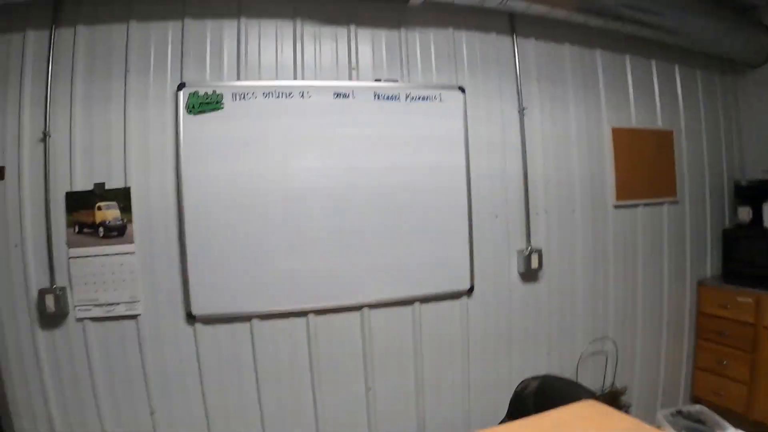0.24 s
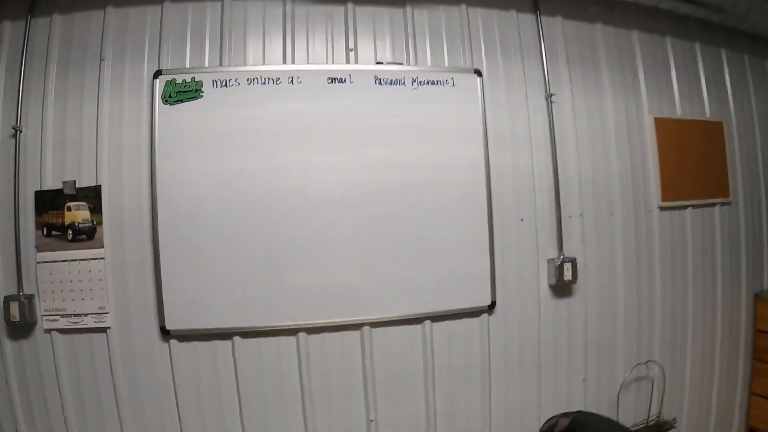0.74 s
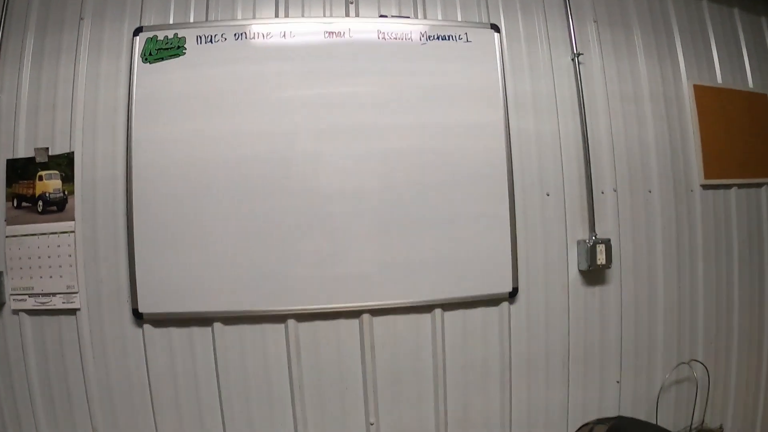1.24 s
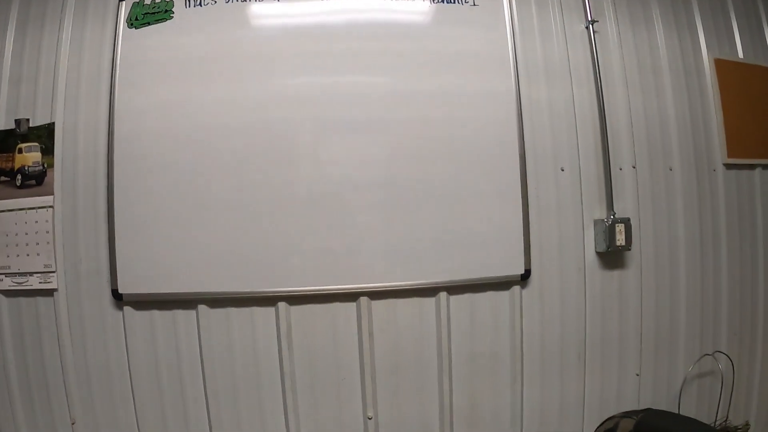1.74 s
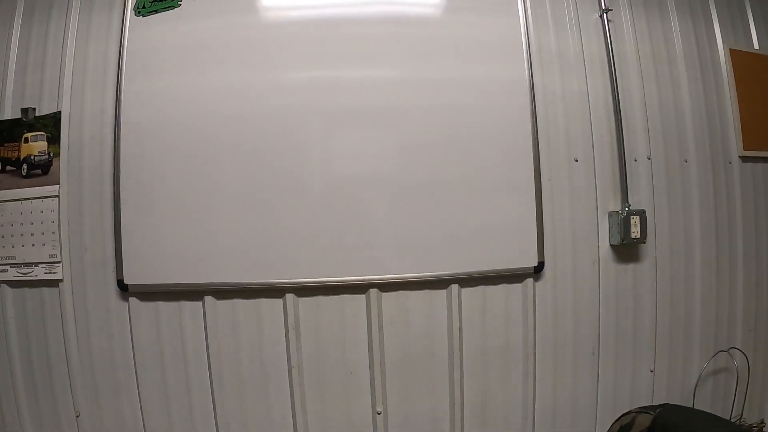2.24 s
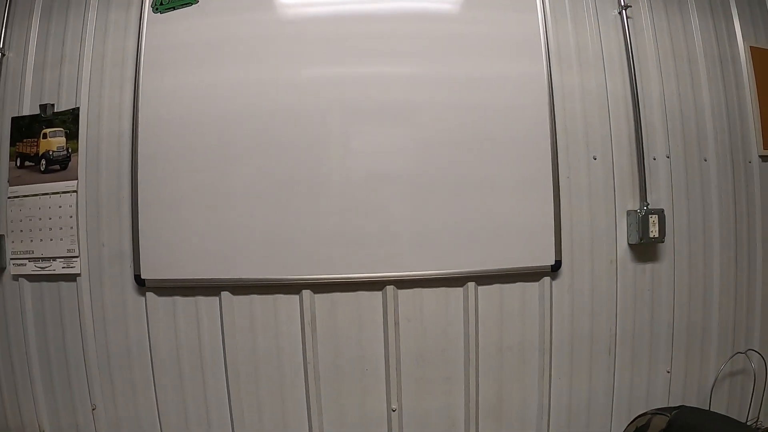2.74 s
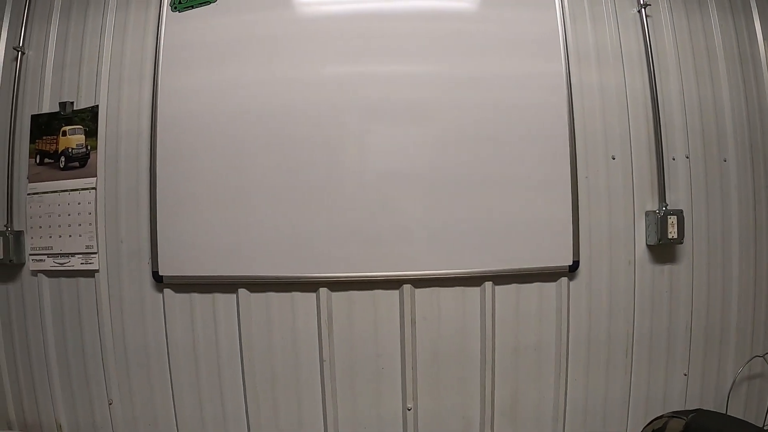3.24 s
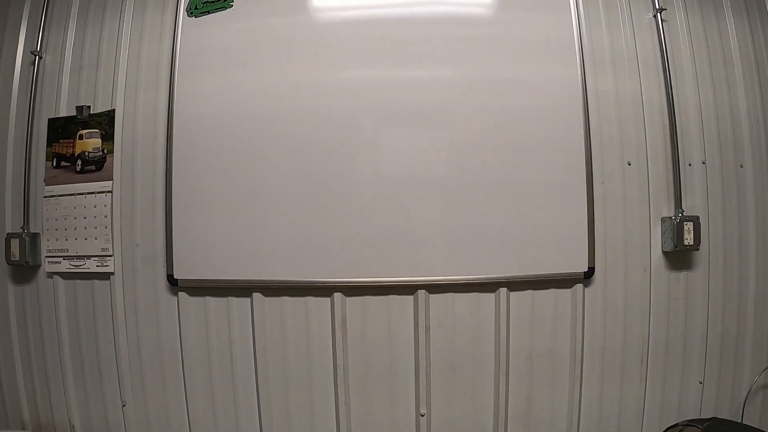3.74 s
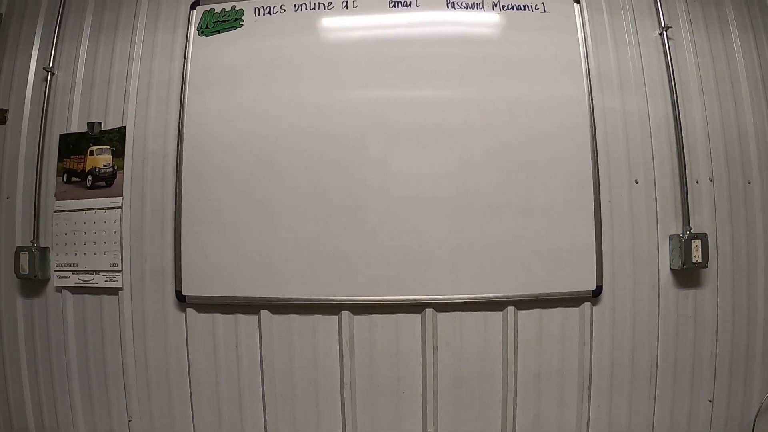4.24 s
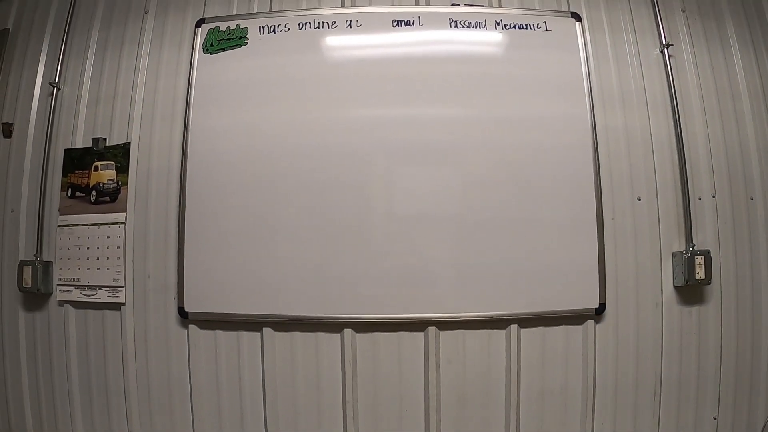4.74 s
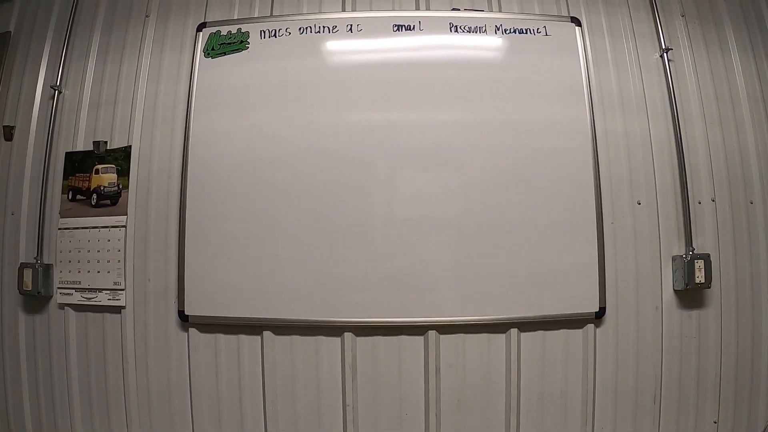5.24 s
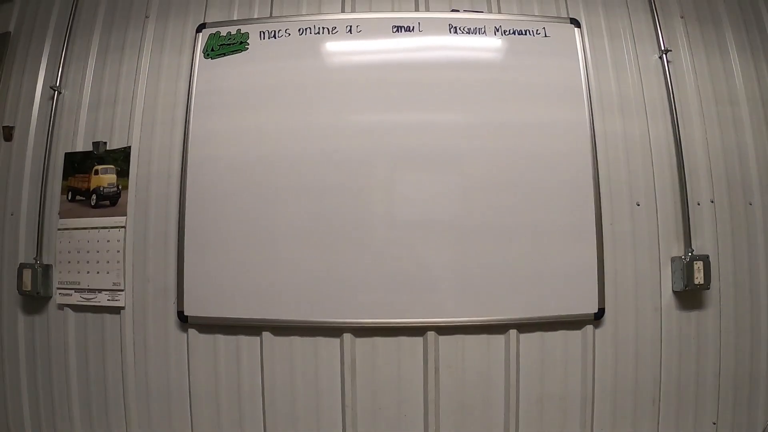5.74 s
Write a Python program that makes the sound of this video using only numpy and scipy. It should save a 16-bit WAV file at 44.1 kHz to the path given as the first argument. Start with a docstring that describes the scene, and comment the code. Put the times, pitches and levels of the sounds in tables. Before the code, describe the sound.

Close stereo handling noise of a small plastic camera, slightly stronger on the right, in a metal-walled workshop with faint steady air. At the start a low rumble from a bang is already dying away, gone within about a second or two. Hollow clacks and clicks fall at 0.2, 0.5 and 1.1 s, while a palm slides over the case in soft broadband swishes from 0.5 to 2.7 s, with thin, fluttering skin squeaks. A heavy double knock lands at 2.1 s; smaller taps follow, and a thunk near 2.5 s leaves a brief low hum, stopped at 2.7 s. Almost silence follows, with one very faint tap at 3.2 s. From 3.7 s fingers grip again: juddering, gritty rubs, dull thuds at 4.1 and 4.3 s, then increasingly crowded knocks and crisp plastic clicks. Low air bumps hit the microphones after 5.2 s. The heaviest knock and snap come at 5.7 s, another thump just before 6 s.

```python
"""Fingers handle a small camera, close on two microphone ports: knocks and juddering rubs ring its body,
clicks and clacks ring its shell and support, and moving air is pressed into the ports.
Earlier a palm slides over the case in swishes of noise, skin squeaks, and the support hums after a thunk.
Then the handling pauses almost to silence before the fingers grip again, harder and busier.
Behind lies a workshop: faint air noise, the fading rumble of a bang, short reflections of the blows."""
import sys
import numpy as np
from scipy import signal
from scipy.fft import rfft, irfft
from scipy.io import wavfile

SR = 44100
rng = np.random.default_rng(int(sys.argv[2]) if len(sys.argv) > 2 else 0)


def waveform_to_disk(signal):
    """Save audio, clipped to [-1, 1], as 16-bit WAV at the path in sys.argv[1]."""
    frames = np.transpose(np.atleast_2d(signal))
    scaled = np.clip(frames, -1, 1) * 32767
    samples = np.round(scaled).astype(np.int16)
    wavfile.write(sys.argv[1], SR, samples)


N = 263718

# Steady air of the place, spectrum: f/Hz, relative level/dB
AIR_SPECTRUM = [(25, -20), (104, -13), (160, 3), (250, 0), (330, -14), (800, -23), (6000, -22.5),
                (9500, -31), (16000, -66)]
# Rumble after the bang, spectrum: f/Hz, relative level/dB
RUMBLE_SPECTRUM = [(25, -10), (54, -4.5), (120, -5.5), (240, -4.5), (450, -15), (870, -12.5), (1300, -18),
                   (3100, -25), (7000, -42.5), (16000, -65.5)]
# Its decay by register: f/Hz, time to fall 60 dB/s
RUMBLE_DECAY = [(60, 2.2), (200, 1.25), (800, 0.93), (4000, 0.77), (10000, 0.7)]
# Skin brushing the case, broad part, spectrum: f/Hz, relative level/dB
SWISH_SPECTRUM = [(300, -6.5), (1800, -1), (3400, -9.5), (4800, -6), (6200, -29.5), (16000, -49)]
# Fine hiss of skin, spectrum: f/Hz, relative level/dB
HISS_SPECTRUM = [(2000, -5), (6400, -8), (10000, -19.5), (13000, -29.5), (16000, -64)]
# Dry scuff of a dragged finger, spectrum: f/Hz, relative level/dB
SCUFF_SPECTRUM = [(1500, -2), (3600, -5), (6500, -9.5), (9000, -17), (13000, -28), (16000, -50)]
# Air pressed into the ports, spectrum: f/Hz, relative level/dB
PRESSURE_SPECTRUM = [(10, 8.5), (25, -4), (45, -12.5), (70, -2), (100, -11.5), (160, -28), (400, -104)]
# Camera body ringing in the hand: f/Hz, width/Hz, level/dB
BODY_MODES = [(63.3, 7.1, -8.5), (156.2, 55.6, 3.5), (241.3, 72.2, 5), (322, 57.7, 2.5), (398.3, 110, -5.5)]
# Plastic shell: f/Hz, width/Hz, level/dB
SHELL_MODES = [(690, 535, 3), (955, 248, 4.5), (1026, 74, 6.5), (1340, 577, -4), (1790, 405, -4.5),
               (2853, 230, -8.5), (2920, 1100, -13)]
# Rasp of skin on the shell: f/Hz, width/Hz, level/dB
RASP_MODES = [(3360, 600, -15.5)]
# Hollow ring of the case on its support: f/Hz, width/Hz, level/dB
HOLLOW_MODES = [(850, 62, 20.5), (980, 83, -14.5)]
# Palm speed in three slides, each as swish level before its gain: t/s, level/dB
PALM_SLIDES = [
    [(0.52, -67.5), (0.712, -59.5), (0.92, -67), (0.972, -62.5), (1.09, -60)],
    [(1.14, -96), (1.198, -61), (1.548, -56), (1.79, -58.5), (1.946, -65.5), (2.05, -61)],
    [(2.17, -85.5), (2.234, -60.5), (2.3, -63.5), (2.446, -73.5), (2.464, -68), (2.65, -67.5)],
]
# Band that stands out of the slides: t/s, level/dB
SLIDE_BAND = [(1.17, -62), (1.205, -51.5), (1.31, -69), (1.64, -48.5), (1.79, -48), (1.91, -63)]
# Skin squeaking on plastic: start t/s, end t/s, f/Hz, level/dB
SKIN_SQUEAKS = [(0.64, 0.83, 4370, -49), (0.3, 1.6, 1850, -60), (0.39, 0.45, 1900, -50),
                (0.69, 0.81, 900, -49), (0.92, 1.14, 4450, -55), (1.43, 1.64, 4330, -49),
                (1.84, 1.9, 900, -51), (4.02, 4.19, 4120, -53.5)]
# Hand pressure, as level of air at the ports before its gain: t/s, level/dB
HAND_PRESSURE = [(0.3, -65), (0.6, -48), (1.05, -55.5), (1.75, -67), (2.15, -35), (2.6, -94), (3.64, -72),
                 (3.82, -39.5), (4.35, -41), (5.2, -37.5), (5.98, -36)]
# Gusts into the ports as the grip shifts: t/s, peak level/dB, f/Hz
GRIP_GUSTS = [(5.169,-28,69), (5.44,-27.5,55), (5.498,-26,33.4), (5.733,-22.5,85), (5.963,-13,67)]
# Fingers catching at a steady rate: start t/s, end t/s, f/Hz, level/dB
STICK_SLIP_GROANS = [(4.203,4.253,277.2,-37.5), (5.619,5.678,278,-38)]
# Finger strokes: start t/s, end t/s, force level/dB, dry friction level/dB before its gains
FINGER_RUBS = [(0.304,0.508,-59,-63), (0.722,0.753,-44.5,-49), (1.467,1.526,-47.5,-61),
               (1.893,1.941,-42.5,-82), (1.981,2.116,-40.5,-66.5), (2.077,2.162,-32,-66.5),
               (2.198,2.306,-43,-80), (2.313,2.369,-56,-60.5), (2.462,2.646,-49.5,-80),
               (3.704,3.856,-45.5,-68.5), (3.818,3.871,-31.5,-68.5), (3.889,4.006,-31,-72),
               (4.055,4.075,-63,-52.5), (4.148,4.193,-35.5,-65.5), (4.183,4.252,-26.5,-65.5),
               (4.459,4.496,-33.5,-67), (4.547,4.614,-36.5,-74), (4.654,4.693,-36.5,-70.5),
               (4.749,4.79,-26.5,-61), (4.793,4.906,-32,-72), (4.895,4.972,-37,-57), (4.97,4.998,-32,-65.5),
               (5.011,5.084,-35,-64), (5.085,5.149,-32.5,-62.5), (5.194,5.235,-32,-60.5),
               (5.235,5.303,-52,-61), (5.331,5.405,-40.5,-68), (5.399,5.483,-46,-56.5),
               (5.437,5.474,-32,-73), (5.503,5.621,-36.5,-71.5), (5.632,5.664,-32.5,-72),
               (5.762,5.86,-35.5,-78), (5.855,5.872,-31,-87), (5.926,5.98,-37,-79)]
# Case against its support: t/s, peak level/dB, f/Hz
SUPPORT_CLACKS = [(0.218,-34,820), (0.495,-29,878), (0.558,-38,990), (0.638,-45,970), (1.105,-30.5,850),
                  (2.125,-34.5,960), (2.232,-36.5,1870), (2.463,-43,600), (4.099,-32,994), (5.735,-28,690)]
# Plastic clicks: t/s, crack level/dB, shell ring level/dB, both before their gains
PLASTIC_CLICKS = [(0.2202,-37.5,-30), (0.4944,-41,-34.5), (1.1048,-28.5,-46.5), (2.0742,-44,-23),
                  (2.0825,-52,-26.5), (2.6621,-40.5,-47), (3.8025,-31,-75), (3.8439,-35,-72),
                  (4.3038,-41,-44), (4.459,-47,-62), (4.51,-44.5,-54), (4.549,-50,-48), (4.616,-46.5,-52),
                  (4.6495,-39.5,-59), (4.9279,-25.5,-30), (5.004,-40.5,-71), (5.1301,-32.5,-42),
                  (5.173,-43,-51), (5.203,-42,-37.5), (5.233,-39,-50), (5.4052,-25.5,-21.5),
                  (5.438,-37.5,-31.5), (5.497,-35.5,-34.5), (5.7335,-25.5,-17.5), (5.969,-38.5,-28.5)]
# Dull knocks on the body: t/s, level/dB before the gain of each part, f/Hz
BODY_KNOCKS = [(0.471,-28.5,90.4), (1.105,-36,194), (2.074,-18.5,269), (2.0825,-17.5,276),
               (2.329,-36.5,180), (2.383,-34,194), (2.466,-32.5,224), (2.668,-44,230), (3.166,-49,178),
               (4.098,-24.5,230), (4.12,-26,230), (4.299,-18.5,227), (4.393,-24,200), (4.672,-24.5,208),
               (4.885,-25,236), (5.12,-28.5,130.6), (5.173,-27.5,141), (5.216,-29,227), (5.37,-25,163),
               (5.716,-21,148), (5.734,-17,335), (5.737,-9,253), (5.964,-13.5,199)]

BODY_HZ = 230   # knock pitch at which the body modes are unshifted
PORT_BALANCE_DB = -8.5   # left minus right: the right port lies nearer the hand
MEAN_FORCE_DB, MEAN_FORCE_HZ, FORCE_DB_PER_OCTAVE = -30, 197.4, 31   # a firmer finger stiffens the body


def from_db(db):
    """Decibels to gain."""
    return 10 ** (np.asarray(db) / 20)


def rms_one(x):
    """Scale to unit power."""
    return x / np.sqrt(np.mean(x ** 2) + 1e-20)


def level_curve(rows):
    """Times and levels as a gain curve, silent outside its span."""
    s, db = np.transpose(rows)
    return from_db(np.interp(np.arange(N) / SR, s, db, left=-200, right=-200))


def at_hz(points, hz):
    """Read a table on a log-frequency axis."""
    f, value = np.transpose(points)
    return np.interp(np.log(hz + 1e-9), np.log(f), value)


def cut(x, hz, kind, order=2):
    """Causal Butterworth filter."""
    edge = np.clip(hz, 10, .45 * SR)
    return signal.sosfilt(signal.butter(order, edge, kind, fs=SR, output="sos"), x)


def resonate(x, modes, stretch=1):
    """Parallel resonances with alternating signs; stretch scales both pitch and width."""
    out = 0
    for k, (hz, width, db) in enumerate(modes):
        radius = np.exp(-np.pi * width * stretch / SR)
        angle = 2 * np.pi * hz * stretch / SR
        feed = np.array([1, 0, -1]) * (1 - radius ** 2) / 2
        feedback = [1, -2 * radius * np.cos(angle), radius ** 2]
        out = out + (-1) ** k * from_db(db) * signal.lfilter(feed, feedback, x + 1e-18)
    return out


def panned(db):
    """Left and right gains for a level difference, left minus right."""
    return from_db(np.array([[db], [-db]]) / 2)


def pair(mid, side, side_db):
    """Two microphones hear a common part and a part of opposite sign."""
    return mid + from_db(side_db) * side * np.array([[1], [-1]])


def noise(spectrum, side_db):
    """Stereo noise of a given colour."""
    colour = from_db(at_hz(spectrum, np.fft.rfftfreq(N, 1 / SR)))
    coloured = irfft(rfft(rng.standard_normal((2, N))) * colour, N)
    return pair(*rms_one(coloured), side_db)


def slips(per_s, spread_db):
    """Random tiny slips of uneven size and either sign."""
    happens = rng.random(N) < per_s / SR
    size = from_db(spread_db * np.clip(rng.standard_normal(N), -2, 2))
    return happens * size * rng.choice([-1, 1], N)


def flutter(hz, depth_db):
    """Uneven contact pressure as a slowly random gain of unit power."""
    wander = rms_one(cut(rng.standard_normal(N), hz, "low"))
    return rms_one(from_db(depth_db * wander))


def contact(t60, grit):
    """One impact followed by a brief crunch of the touching surfaces."""
    t = np.arange(SR // 6) / SR
    return (t == 0) + grit * rng.standard_normal(len(t)) * from_db(-60 * t / t60)


def add(out, s, sound, db, pan_db=0):
    """Place a sound at a time, with a peak level before panning."""
    at = int(s * SR)
    placed = from_db(db) * panned(pan_db) * sound / np.abs(sound).max()
    out[:, at:at + sound.shape[-1]] += placed[:, :N - at]


def stroke(start, end, rise, fall):
    """A gesture's envelope: it sets in, holds and lets go."""
    t = np.arange(N) / SR
    return np.clip(np.minimum((t - start) / rise, (end - t) / fall) + .5, 0, 1)


def swell(start, end):
    """A gesture's envelope: it grows to the middle and fades."""
    t = np.arange(N) / SR
    return np.sin(np.pi * np.clip((t - start) / (end - start), 0, 1))


def workshop_air(db=-67):
    """Steady coloured noise stands for the air of the place."""
    return from_db(db) * noise(AIR_SPECTRUM, side_db=1.0)


def rumble(db=-24):
    """The room rings out after a bang; the higher the register, the sooner it dies."""
    t = np.arange(N) / SR
    start = rfft(noise(RUMBLE_SPECTRUM, side_db=-15.5))
    f = np.fft.rfftfreq(N, 1 / SR)
    out = 0
    for hz, t60 in RUMBLE_DECAY:
        # overlapping registers that sum to the whole spectrum
        share = at_hz([(centre, centre == hz) for centre, _ in RUMBLE_DECAY], f)
        out = out + irfft(start * share, N) * from_db(-60 * t / t60)
    return from_db(db) * out


def workshop(x, t60=0.14, wall_hz=5500):
    """Diffuse reflections from the metal walls: decaying noise that begins 6 ms after the sound."""
    t = np.arange(SR // 2) / SR
    tail = rng.standard_normal((2, len(t))) * from_db(-60 * t / t60) * (t > .006)
    tail = cut(tail / np.sqrt(np.sum(tail[0] ** 2)), wall_hz, "low")
    return signal.fftconvolve(x.mean(axis=0)[None], tail, axes=1)[:, :N]


def support(s=2.465, held_s=2.68, hz=107, t60=0.74, db=-35):
    """Let go, the support swings on in one low, decaying note until a finger stills it."""
    t = np.maximum(np.arange(N) / SR - s, 0)
    swing = from_db(db - 60 * t / t60) * np.sin(2 * np.pi * hz * t)
    return swing * stroke(s, held_s, rise=0.0048, fall=0.054)


def slide(swish_db=3.5, drag_db=-4.5, band_hz=2800, band_width_hz=1500, fade_s=0.15, release_s=0.21):
    """Skin brushes the case: a swish, a band that stands out, a fine hiss and a soft drag on the body."""
    t, speed = np.arange(N) / SR, 0
    for rows in PALM_SLIDES:
        s, db = np.transpose(rows)
        hold = stroke(s[0] - fade_s / 2, s[-1] + release_s / 2, fade_s, release_s)
        speed = speed + from_db(np.interp(t, s, db)) * hold
    modes = [(band_hz, band_width_hz, 0)]
    rush = pair(*rng.standard_normal((2, N)), side_db=-7.5)
    band = level_curve(SLIDE_BAND) * rms_one(resonate(resonate(rush, modes), modes))
    swish = from_db(swish_db) * speed * noise(SWISH_SPECTRUM, side_db=-6.0)
    # the hiss swings about half as far in dB as the swish
    hiss = from_db(-31.5) * speed ** 0.53 * noise(HISS_SPECTRUM, side_db=-3.0)
    shaken = resonate(slips(per_s=1000, spread_db=5.0), BODY_MODES, stretch=0.928)
    drag = from_db(drag_db) * speed * rms_one(cut(shaken, 150, "high"))
    return (swish + hiss + band) * flutter(hz=48.7, depth_db=1.0) + drag


def squeaks(overtone=1.504, overtone_db=-15, halo_db=-11, width_hz=130):
    """Skin catches on plastic: noise rings in a thin, fluttering note; high notes add a halo of hiss."""
    friction = pair(*rng.standard_normal((2, N)), side_db=-9.0)
    halo = from_db(halo_db) * rms_one(cut(noise(HISS_SPECTRUM, side_db=-1), 5200, "high"))
    out = 0
    for start, end, hz, db in SKIN_SQUEAKS:
        modes = [(hz, width_hz, 0), (hz * overtone, width_hz * 2, overtone_db)]
        note = rms_one(resonate(friction, modes))
        out = out + from_db(db) * swell(start, end) ** 2 * (note + (hz > 3000) * halo)
    return out * flutter(hz=28, depth_db=4.5)


def grip(pressure_db=3.0, tremor_db=-7.5):
    """The hand presses air into the ports in lumps and trembles on the body."""
    ports = from_db(pressure_db) * noise(PRESSURE_SPECTRUM, side_db=-9.0) * panned(PORT_BALANCE_DB)
    shaken = resonate(slips(per_s=390, spread_db=7.0), BODY_MODES)
    tremor = from_db(tremor_db) * rms_one(cut(shaken, 480, "low", order=4))
    lumps = flutter(hz=18, depth_db=2.5)
    return level_curve(HAND_PRESSURE) * lumps * (ports + tremor)


def gusts():
    """A shift of the grip moves air at the ports in a single swing of pressure, down and up."""
    out = np.zeros((2, N))
    for s, db, hz in GRIP_GUSTS:
        turn = np.linspace(0, 2 * np.pi, int(SR / hz))
        add(out, s, -np.sin(turn) * np.sin(turn / 2), db, PORT_BALANCE_DB)
    return out


def groans(waver=0.0914):
    """Stick and slip lock onto the body in a brief, wavering low note."""
    speed = 1 + waver * rms_one(cut(rng.standard_normal(N), 81.0, "low"))
    out = 0
    for start, end, hz, db in STICK_SLIP_GROANS:
        note = np.sqrt(2) * np.sin(2 * np.pi * hz * np.cumsum(speed) / SR)
        out = out + from_db(db) * swell(start, end) * note
    return out


def pitch_under(force_db):
    """Pitch of the body under a finger, higher for a firmer touch."""
    return MEAN_FORCE_HZ * 2 ** ((force_db - MEAN_FORCE_DB) / FORCE_DB_PER_OCTAVE)


def spot(x, echo=0.28, size=200):
    """Each touched spot sends its own brief echoes through the case, and so has its own colour."""
    path = echo * rng.standard_normal((2, size)) * np.linspace(1, 0, size)
    path[:, 0] = 1
    return rms_one(signal.fftconvolve(x, pair(*path, side_db=-12.0), axes=1)[:, :x.shape[1]])


def rubs(hiss_db=10, dry_scrape_db=-3, judder_stretch=1.139, spot_octaves=0.26, burst_s=0.004,
         steady=0.58, fade_s=0.043, scrape_db=-48, scrape_growth=1.4, ease_db_per_s=21):
    """Fingers stick and slip: coarse slips shake the body and free bursts of grit that rasp on the shell."""
    drag = pair(slips(per_s=330, spread_db=2), slips(per_s=330, spread_db=2), side_db=-14)
    smear = np.exp(-1 / (burst_s * SR))
    bursts = steady + signal.lfilter([1], [1, -smear], np.abs(drag[0]))
    fine = pair(slips(per_s=2200, spread_db=5), slips(per_s=3600, spread_db=3.5), side_db=-6.5)
    grit = bursts * fine
    scrape = cut(resonate(grit, SHELL_MODES) + resonate(grit, RASP_MODES), 3700, "low", order=4)
    hiss = bursts * noise(SCUFF_SPECTRUM, side_db=-2.5)
    out, t = np.zeros((2, N)), np.arange(N) / SR
    for start, end, force_db, dry_db in FINGER_RUBS:
        rise = np.interp(force_db, [-46, -36], [.03, .006])   # light touches swell, firm ones bite
        shape = stroke(start, end, rise, rise + 0.014)
        # the friction comes and goes more gently
        rustle = stroke(start + rise / 2, end, 2 * rise, rise + fade_s)
        now = shape + rustle > 0
        # each spot tunes the body a little differently
        tuning = 2 ** (spot_octaves * rng.uniform(-0.76, 1))
        stretch = judder_stretch * pitch_under(force_db) / BODY_HZ * tuning
        shaken = resonate(drag[:, now], BODY_MODES, stretch)
        judder = from_db(force_db) * rms_one(cut(shaken, 460 * stretch, "low", order=7))
        pressed = from_db(scrape_db + scrape_growth * (force_db - MEAN_FORCE_DB))
        scraping = np.hypot(pressed, from_db(dry_db + dry_scrape_db))
        friction = scraping * spot(scrape[:, now]) + from_db(dry_db + hiss_db) * spot(hiss[:, now])
        easing = from_db(-ease_db_per_s * (t[now] - start))   # the finger eases off as it drags
        out[:, now] += easing * (shape[now] * judder + rustle[now] * friction)
    return out


def clacks(plain_hz=850, side_db=-6, lean_db_per_s=-3.5):
    """The case rocks against its support: a short, hollow ring that leans ever further right."""
    out = np.zeros((2, N))
    for s, db, hz in SUPPORT_CLACKS:
        blow = pair(contact(t60=0.05, grit=0.021), contact(t60=0.021, grit=0.24), side_db)
        ring = cut(resonate(blow, HOLLOW_MODES, hz / plain_hz), 2 * hz, "low")
        add(out, s, ring, db, lean_db_per_s * s)
    return out


def clicks(snap_db=9.0, shell_db=4.0, even_hz=3960, db_per_octave=91):
    """Plastic parts snap past each other: a crack, brighter the less the shell rings, and that ring."""
    out = np.zeros((2, N))
    for s, db, ring_db in PLASTIC_CLICKS:
        hz = even_hz * 2 ** ((db - ring_db) / db_per_octave)
        crack = pair(contact(t60=0.017, grit=0.16), contact(t60=0.008, grit=0.58), side_db=-7.5)
        crack = cut(cut(crack, hz * 0.5, "high"), hz * 1.24, "low", order=3)
        add(out, s, crack, db + snap_db)
        ring = cut(resonate(contact(t60=0.018, grit=0.13), SHELL_MODES), 2300, "low")
        add(out, s, ring, ring_db + shell_db)
    return out


def sag(x, depth=0.15, settle_s=0.01):
    """The body is stiffest at the moment of a blow; its pitch sinks as the finger relaxes."""
    t = np.arange(len(x)) / SR
    bent = (1 - depth) * t + 2 * depth * settle_s * (1 - np.exp(-t / settle_s))
    return np.interp(bent, t, x)


def knocks(blows, lean_db_per_s, shell_db, softness=2.06, thud_db=5.5, twist=0.82, twist_db=-19,
           puff_db=-12, shell_db_per_octave=5.5):
    """Blows thump and twist the body, puff air into the ports and ring the shell, more so when high."""
    out = np.zeros((2, N))
    for s, db, hz in blows:
        pan_db = lean_db_per_s * s   # a positive lean moves to the left
        blow = contact(t60=0.004, grit=0.0087)
        thump = sag(resonate(blow, BODY_MODES, hz / BODY_HZ))
        twisting = resonate(blow, BODY_MODES, twist * hz / BODY_HZ)
        thud = pair(thump, twisting, side_db=twist_db)
        add(out, s, cut(thud, softness * hz, "low", order=5), db + thud_db, pan_db)
        puff = resonate(blow, [(50.7, 19, 0)])   # f/Hz, width/Hz, level/dB
        add(out, s, cut(puff, 120, "low"), db + puff_db, PORT_BALANCE_DB)
        crunch = pair(contact(t60=0.034, grit=1.0), contact(t60=0.026, grit=0.048), side_db=5.5)
        ring_db = db + shell_db + shell_db_per_octave * np.log2(hz / BODY_HZ)
        add(out, s, cut(resonate(crunch, SHELL_MODES), 4700, "low"), ring_db, pan_db)
    return out


def landings(landing_db=4.5):
    """Every rub begins with a soft blow of the finger."""
    blows = [(start, force_db + landing_db, pitch_under(force_db)) for start, _, force_db, _ in FINGER_RUBS]
    return knocks(blows, lean_db_per_s=0.2, shell_db=-15)


def port_lag(x, lag_s=0.00018):
    """Blows reach the left port later and later, by lag_s at the end."""
    n = np.arange(N)
    return np.array([np.interp(n - lag_s * SR * (n / N) ** 2, n, x[0]), x[1]])


def scene():
    """Handling reaches the microphones directly; a little of the blows returns from the room."""
    body_blows = knocks(BODY_KNOCKS, lean_db_per_s=0.28, shell_db=-12) + landings() + clacks()
    blows = port_lag(body_blows) + clicks()
    background = workshop_air() + rumble() + from_db(-9.5) * workshop(blows)
    hand = slide() + squeaks() + grip() + gusts() + groans() + rubs()
    return background + support() + hand + blows


def record(dry):
    """Slow pressure leaks away, the heaviest knocks are rounded and the top is cut steeply."""
    leaked = cut(dry, 12, "high", order=1)
    rounded = .8 * np.tanh(leaked / .8)
    steep = signal.ellip(10, .1, 80, 15800, fs=SR, output="sos")   # ripple/dB, rejection/dB, edge f/Hz
    return signal.sosfilt(steep, rounded)


dry = scene()
out = record(dry)
waveform_to_disk(out)
```